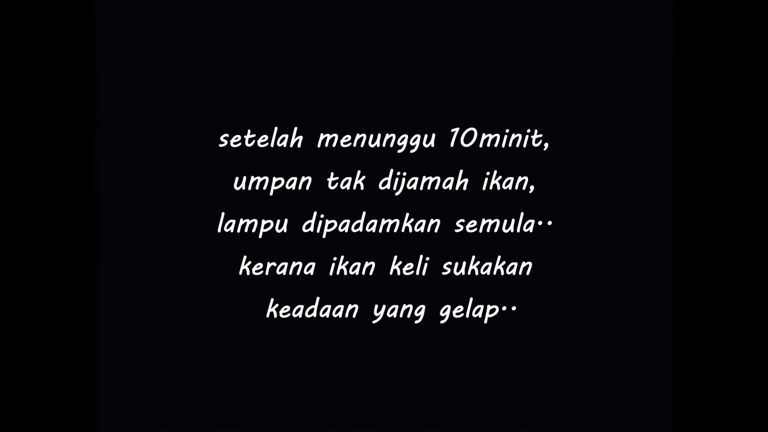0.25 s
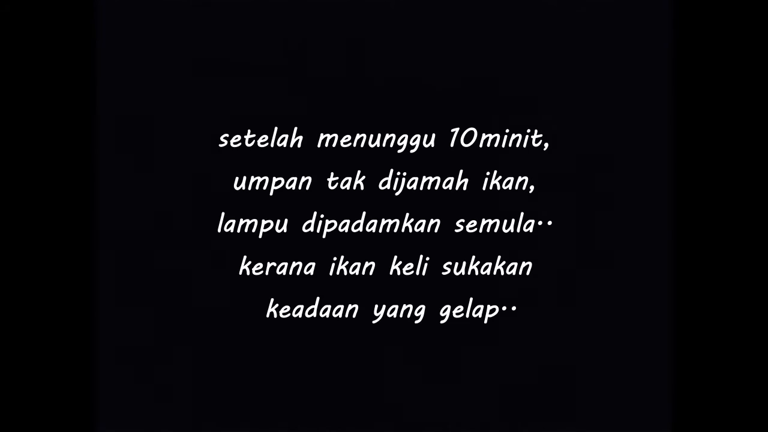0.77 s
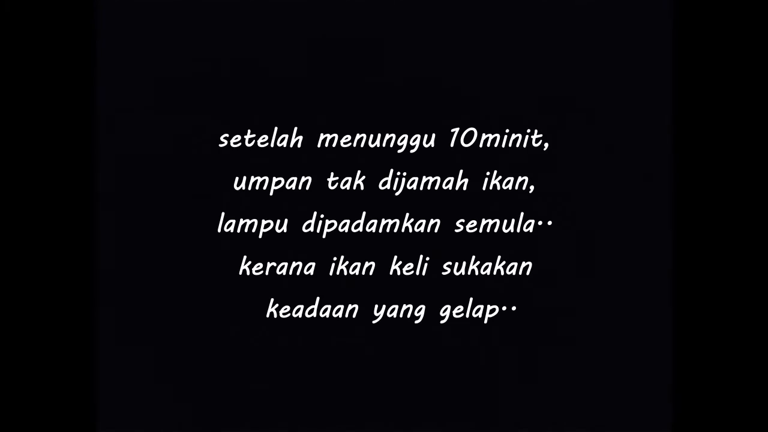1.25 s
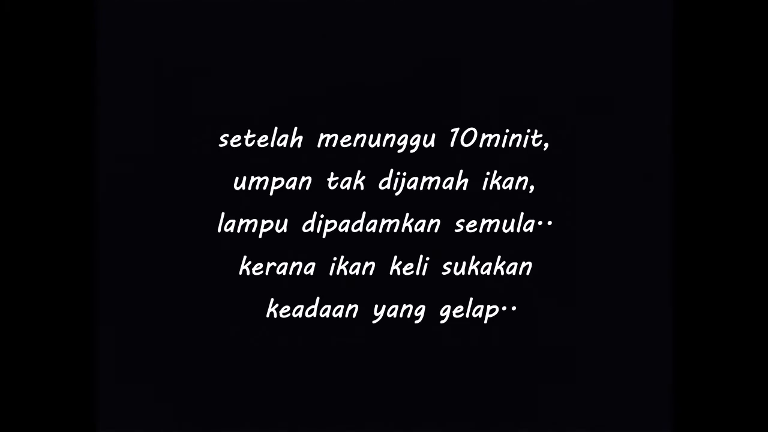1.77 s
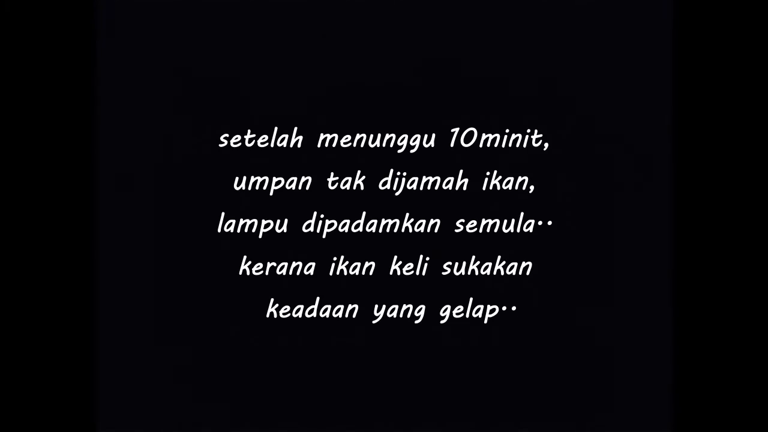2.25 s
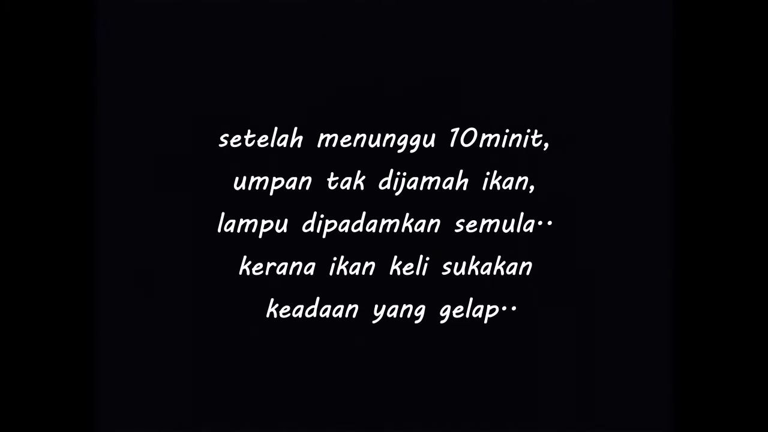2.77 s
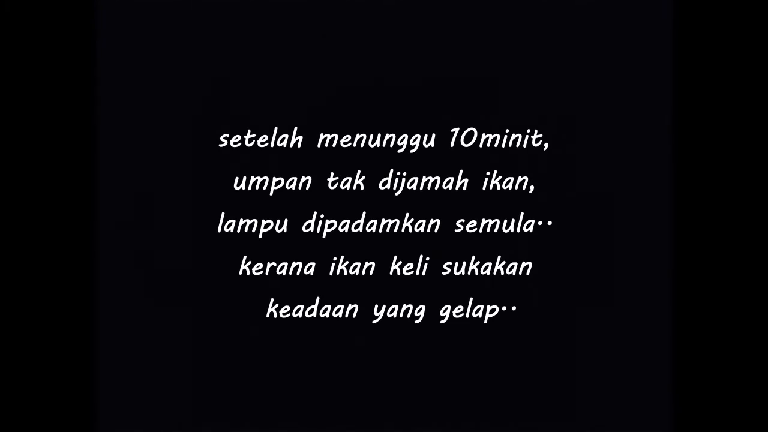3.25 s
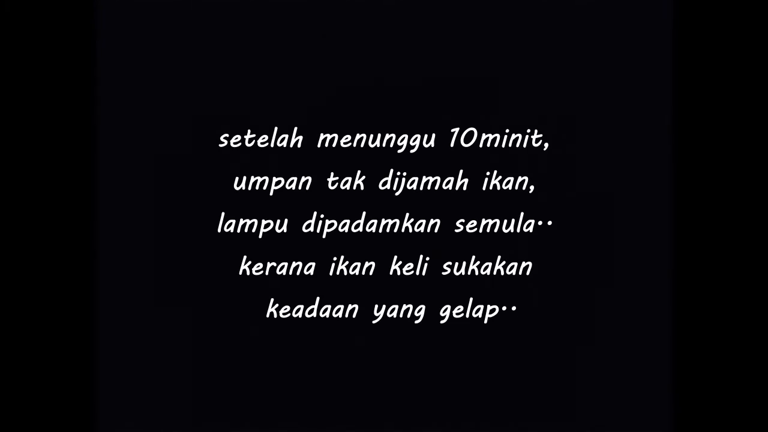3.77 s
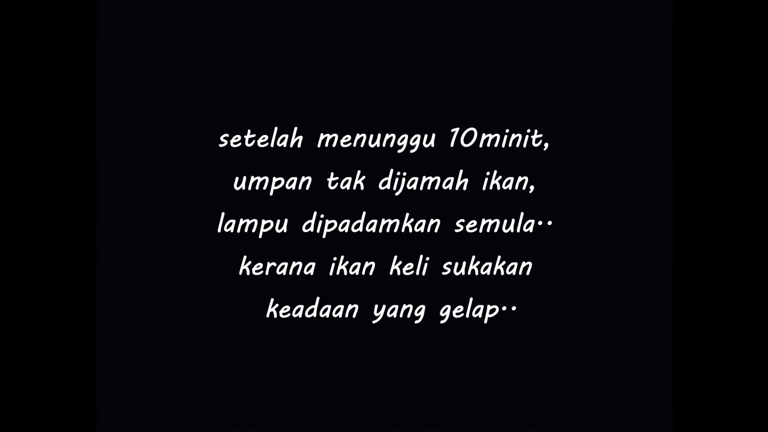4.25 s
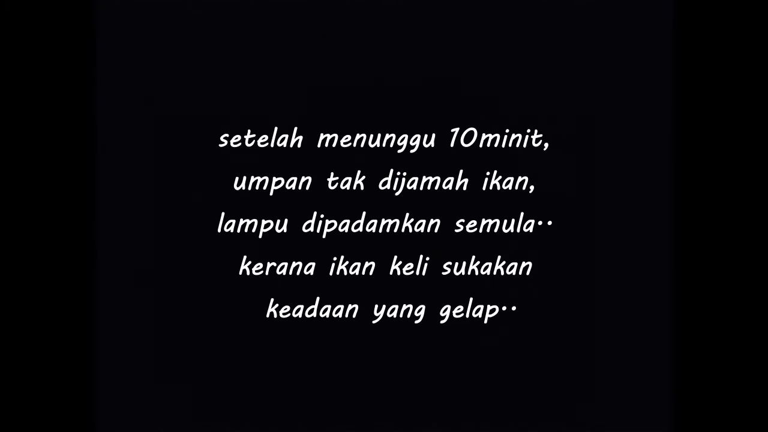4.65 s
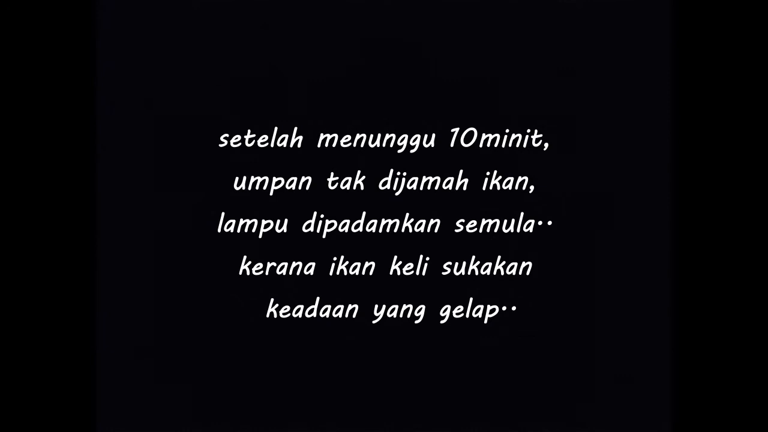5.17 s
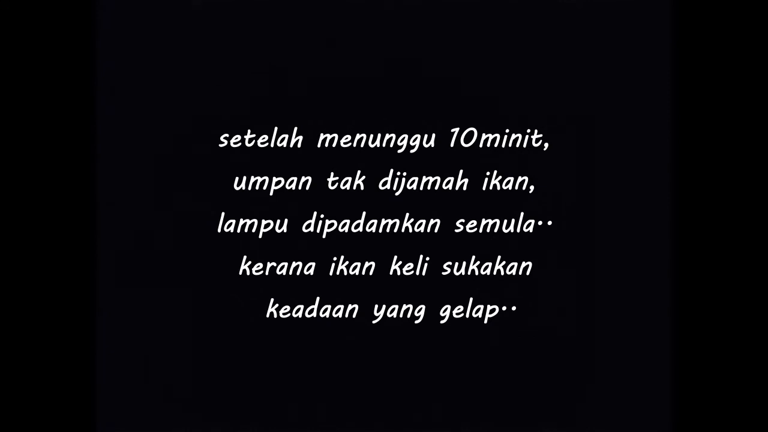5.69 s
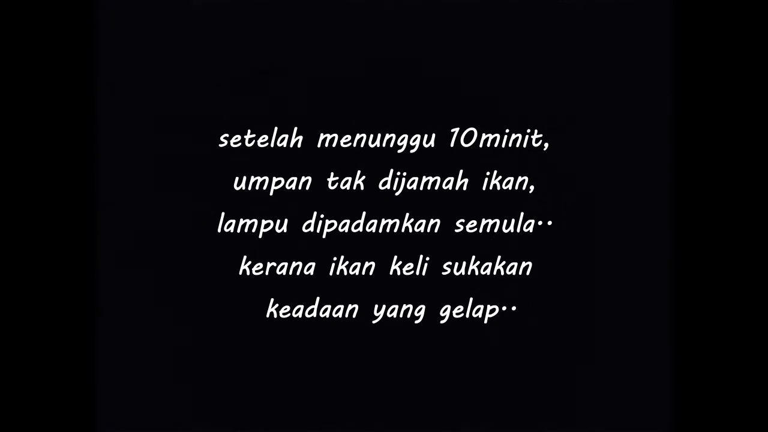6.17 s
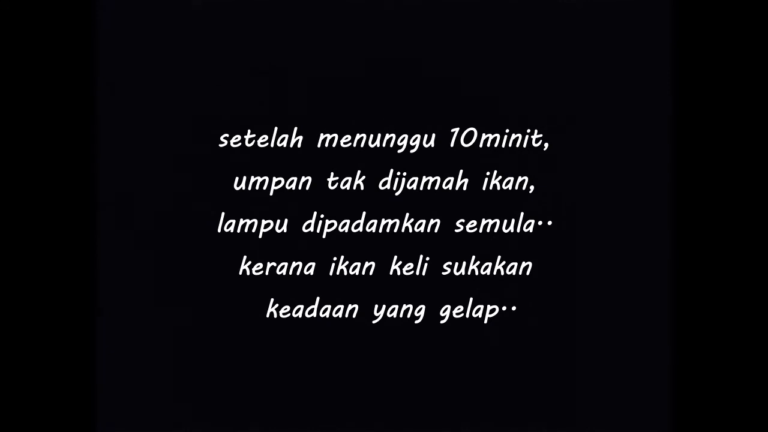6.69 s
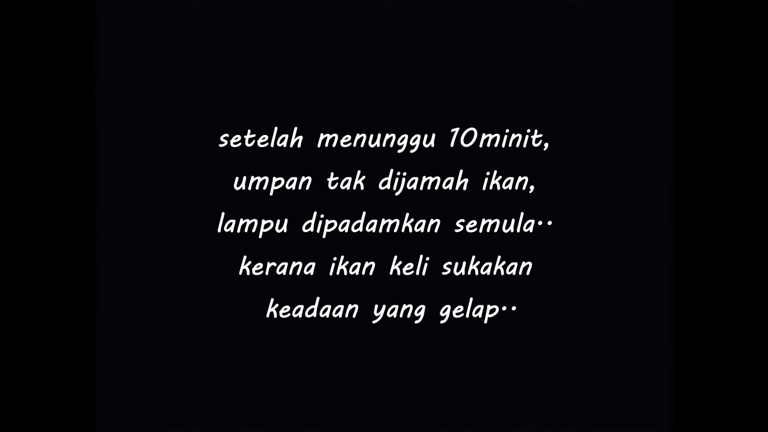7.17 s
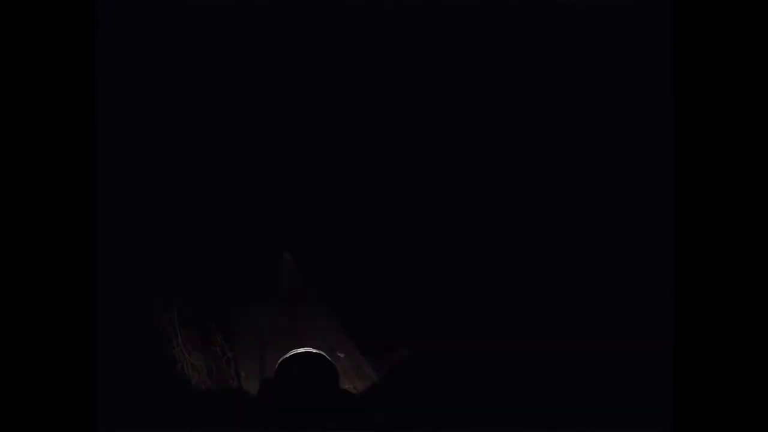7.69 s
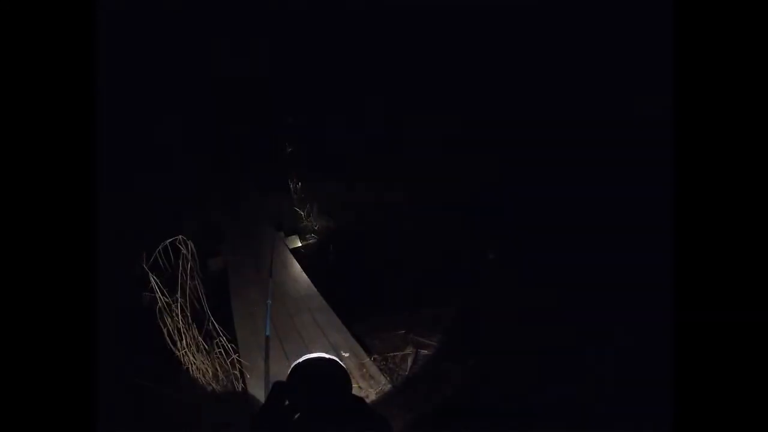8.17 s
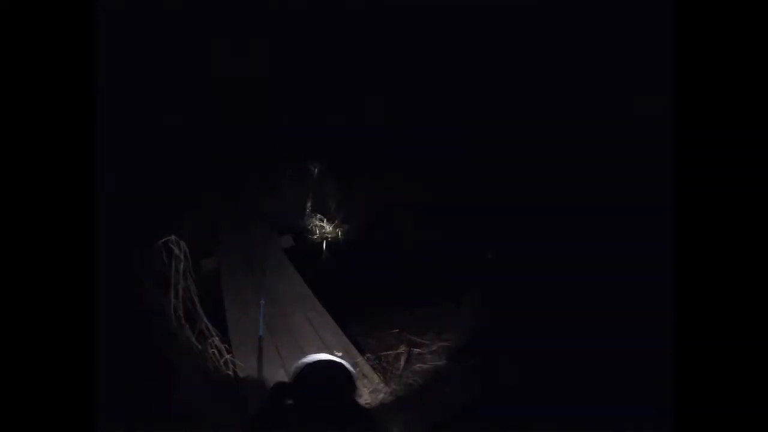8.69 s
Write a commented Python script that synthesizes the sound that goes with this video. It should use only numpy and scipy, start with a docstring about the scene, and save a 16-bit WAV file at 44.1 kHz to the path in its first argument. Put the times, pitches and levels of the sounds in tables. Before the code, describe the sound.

Outdoors at night, a close cricket trills rapidly over chirping field crickets, fast high katydid bursts and a blurred insect bed, with faint traffic rumble. After about seven seconds everything abruptly becomes much louder; fingers tap and rub a plastic lamp right at the microphone, its switch snaps twice, and the loud insects continue.

```python
"""Night beside a ditch: a dense chorus of crickets and katydids over a far traffic rumble.
From the start a close cricket trills in falling wing-stroke tones, others chirp in bouts, the rest blur into a bed.
A hoarse, distant caller returns every second or two; a far vehicle passes early and another late.
At 7.26 s the whole night jumps in volume; fingers then tap and rub a lamp right at the microphone.
Its switch snaps twice, at 7.58 and 7.77 s, as filtered impulses that ring the plastic shell."""
import sys
import numpy as np
from scipy import signal
from scipy.fft import rfft, irfft
from scipy.io import wavfile

SR = 44100
rng = np.random.default_rng(int(sys.argv[2]) if len(sys.argv) > 2 else 0)


def dump_mix(stems):
    """Bounce the given channels to the path in sys.argv[1] as a 16-bit WAV at rate SR."""
    frames = np.atleast_2d(stems).T  # one column per channel
    limited = np.clip(frames, -1, 1)  # hard clip at full scale
    pcm = np.round(limited * 32767).astype(np.int16)
    wavfile.write(sys.argv[1], SR, pcm)


N = 393813
TIME = np.arange(N) / SR   # seconds
CUTOFF_HZ = 15800


def from_db(db):
    """Decibels to gain."""
    return 10 ** (np.asarray(db) / 20)


def rms_one(x):
    """Scale to unit rms."""
    return x / np.sqrt(np.mean(x ** 2) + 1e-20)


def add(out, s, sound):
    """Mix a sound in, starting at s seconds."""
    start = int(round(s * SR))
    first, last = max(start, 0), min(start + len(sound), N)
    if last > first:
        out[first:last] += sound[first - start:last - start]


def beats(first_s, every_s, count, slowing_s=0):
    """Times of an even rhythm whose gap grows by slowing_s with every beat."""
    k = np.arange(round(count))
    return first_s + every_s * k + slowing_s * k * (k - 1) / 2


def bump(s, width_s):
    """A bell of height 1 round a moment."""
    return np.exp(-((TIME - s) / width_s) ** 2)


def drift(per_s):
    """Slow chance, rms 1: random points, per_s of them a second, joined by straight lines."""
    knots = rng.standard_normal(2000)
    return rms_one(np.interp(TIME * per_s, np.arange(len(knots)), knots))


def noise(spectrum):
    """Noise of rms 1, coloured by (Hz, relative dB) points joined on a log frequency scale."""
    hz, db = np.transpose(spectrum)
    bins = np.maximum(np.fft.rfftfreq(N, 1 / SR), 1)
    gain = from_db(np.interp(np.log(bins), np.log(np.sort(hz)), db, left=-80, right=-80))
    return rms_one(irfft(rfft(rng.standard_normal(N)) * gain, N))


def scatter(x, wet_db, t60):
    """Grass and banks send back a dense tail that falls 60 dB in t60 seconds."""
    t = TIME[:SR // 2]
    tail = rng.standard_normal(len(t)) * from_db(-60 * t / t60) * (t > .003)
    tail /= np.linalg.norm(tail)
    return x + from_db(wet_db) * signal.fftconvolve(x, tail)[:N]


def add_stroke(out, s, db, hz, fall_hz, length, overtone_db=-45):
    """One wing closing, centred on s: the scraper slows along the file, so the tone falls as it swells and fades."""
    t = np.arange(-length / 2, length / 2, 1 / SR)
    phase = 2 * np.pi * (hz * t - fall_hz * t ** 2 / (2 * length) + rng.random())
    overtone = from_db(overtone_db) * np.sin(2 * phase) * (2 * hz < CUTOFF_HZ)
    swell = np.cos(np.pi * t / length) ** 2
    add(out, s - length / 2, from_db(db) * swell * (np.sin(phase) + overtone))


def crowd(hz, fall_hz, length, per_s, spread=0.037):
    """Many wing strokes out of step, each a little off in pitch and loudness; rms 1."""
    chance = rng.random((6000, 4))[:int(per_s * N / SR)]
    when, size, detune, turn = chance.T[:, :, None]
    t = np.arange(-length / 2, length / 2, 1 / SR)
    carrier_hz = hz * (1 + spread * np.sqrt(12) * (detune - .5))
    phase = carrier_hz * t - fall_hz * t ** 2 / (2 * length) + turn
    tone = np.sin((2 * np.pi * phase).astype(np.float32))
    strokes = (1 + size) * np.cos(np.pi * t / length) ** 2 * tone
    at = (when * N).astype(int) + np.arange(len(t))
    return rms_one(np.bincount(at.ravel(), strokes.ravel(), N)[:N])


def engine(hz):
    """The firing note of a far engine, wavering in pitch and level."""
    wavering_hz = hz + 1.355 * drift(3)
    return from_db(1 + 2.4 * drift(5.3)) * np.sin(2 * np.pi * np.cumsum(wavering_hz) / SR)


# Colour of the night air and traffic. Each row: frequency in Hz, relative level in dB.
AIR_COLOUR = [(25, -8), (62, 2), (115, -10.5), (160, 0.5), (260, -22.5), (500, -28.5), (800, -21),
              (1050, -31.5), (1400, -29.5), (2000, -34.5), (10500, -23.5), (12300, -60), (14600, -28.5),
              (16000, -57)]
# Far vehicles pass. Each row: time when nearest in seconds, half-width in seconds,
# relative level in dB, mean engine note in Hz.
PASSES = [(1.2, .45, -54, 93), (8.05, 0.63, -48.5, 62.3)]


def traffic():
    """Faint air and the low hum and firing notes of far engines; the rumble swells as vehicles pass."""
    hum = from_db(-2) * noise([(45, -33), (56, -18.0), (63, 4.0), (70, -27.0), (85, -4.0), (110, -23.5),
                               (135, -13), (154, -16.5), (230, -31.0), (400, -43)])
    air = from_db(-56.0) * noise(AIR_COLOUR)
    idle = from_db(-65.5) * (hum + engine(62.5))
    whine = from_db(-67) * engine(158.3)   # a higher line of the far engine
    passing = sum(from_db(db) * bump(s, width_s) * (hum + engine(hz)) for s, width_s, db, hz in PASSES)
    return air + idle + whine + passing


# Distant crowds of insects. Each row: centre in Hz, fall over a stroke in Hz, stroke length in seconds,
# strokes per second, relative rms level in dB.
CROWDS = [(3079, 590, 0.03608, 110, -55), (4578, 1420, 0.0088, 250, -51), (6704, 410, 0.0087, 250, -55.5),
          (7570, 860, 0.01202, 560, -53.5)]
# How the 5 kHz crowd swells and sinks. Each row: time in seconds, level change in dB.
EAGERNESS = [(0, 1.5), (1.4, 3), (2.9, -2.5), (5.4, -2.5), (7.3, 6.5), (8.93, 5.5)]
# Colour of the blur of the farthest insects. Each row: frequency in Hz, relative level in dB.
BLUR_COLOUR = [(2400, -24), (2650, -16.5), (2900, -2.5), (3300, 9.5), (3650, -12.5), (4050, -8.5),
               (4550, 5.5), (5300, 6), (5750, -1), (6100, -11), (6650, 8), (7150, 0), (8300, 1), (9300, 1),
               (11200, -52)]


def chorus():
    """Crowds of strokes and a noise blur behind them; fixed paths through the grass ripple their colour."""
    crowds = sum(from_db(db) * crowd(hz, fall_hz, length, per_s)
                 for hz, fall_hz, length, per_s, db in CROWDS)
    field_db = -52.5 + np.interp(TIME, *np.transpose(EAGERNESS))
    field = from_db(field_db) * crowd(5066, 930, 0.022, 200, spread=0.034)
    blur = from_db(-44.0 + .5 * drift(24)) * noise(BLUR_COLOUR)
    return scatter(crowds + field + blur, wet_db=-7.5, t60=0.32)


# Far steady trillers. Each row: carrier in Hz, strokes per second, fall over a stroke in Hz,
# relative level in dB.
DRONES = [(4619, 73, 800, -49.5), (5556, 129, 950, -48.5), (5061, 36, 600, -49), (6848, 72, 500, -55),
          (8339, 110, 300, -59)]


def drones(waver_hz=5, flutter_db=-3.5):
    """Far trillers so regular that each draws a comb of fine lines round its carrier."""
    out = np.zeros(N)
    for hz, per_s, fall_hz, db in DRONES:
        # place within each stroke, -0.5 to 0.5
        cycle = (per_s * TIME + 0.036 * drift(4.3)) % 1 - .5
        waver = np.cumsum(waver_hz * drift(9)) / SR
        phase = hz * TIME + waver - fall_hz * cycle ** 2 / (2 * per_s)
        strokes = np.cos(np.pi * cycle) ** 2 * np.sin(2 * np.pi * phase)
        out += from_db(db + flutter_db * drift(16)) * rms_one(strokes)
    return scatter(out, wet_db=-5.5, t60=0.033) * from_db(-8.0)


# A far animal calls hoarsely. Each entry: middle of the call in seconds.
FAR_CALLS = [1.17, 2.39, 3.67, 5.08, 6.55, 8.9]


def far_caller(call_s=0.41, level_db=-69):
    """Soft, hoarse calls just below the crickets: swells of band-coloured noise."""
    calls = np.zeros(N)
    for s in FAR_CALLS:
        add(calls, s - call_s / 2, signal.windows.hann(int(call_s * SR)))
    return from_db(level_db) * calls * noise([(1700, -17), (2100, 0), (2350, 3), (2800, -6)])


# A low-pitched cricket further off. Each row: first stroke in seconds, number of strokes.
LOW_PHRASES = [(0.111, 4), (.66, 3), (1.361, 2), (1.949, 4), (2.568, 2), (3.141, 4), (3.67, 4), (4.398, 2),
               (4.82, 4), (5.231, 2), (5.6, 3), (5.92, 2), (6.829, 4), (7.86, 4), (8.48, 3)]


def low_cricket(gap_s=.066, level_db=-53.5):
    """Slow, soft strokes just under the trill in pitch, blurred by distance."""
    out = np.zeros(N)
    for s, strokes in LOW_PHRASES:
        for when in beats(s, gap_s, strokes):
            db, hz = level_db + rng.normal(0, 1.2), 2780 + rng.normal(0, 25)
            add_stroke(out, when, db, hz, fall_hz=520, length=.045)
    return scatter(out, wet_db=-3, t60=0.7)


def raspers(rasp_s=0.29, buzz_s=0.74, rasp_db=-50, uneven_db=1.7):
    """Dense strokes gated three times a second round a ringing core; a higher insect joins with slower buzzes."""
    rasp, buzz = np.zeros(N), np.zeros(N)
    # the rasping speeds up a little with every rasp
    for s in beats(.058, .3353, count=28, slowing_s=-.0009):
        swell = signal.windows.tukey(int(rasp_s * SR), .7)
        add(rasp, s - rasp_s / 2, from_db(rasp_db + rng.normal(0, uneven_db)) * swell)
    for s in beats(3.26, 0.65, count=9):
        add(buzz, s - buzz_s / 2, signal.windows.tukey(int(buzz_s * SR), .5))
    rasping = crowd(8120, 900, .006, 500, spread=.035)
    core = from_db(-8) * noise([(8200, -31), (8330, -7), (8460, -8)])
    buzzing = from_db(-63.5) * crowd(9840, 900, 0.0058, 400, spread=0.029)
    return rasp * (rasping + core) + buzz * buzzing


# The katydid's runs. Each row: middle of the first burst in seconds, number of bursts.
KATYDID_RUNS = [(.05, 10), (1.42, 59)]


def katydid(gap_s=.0083, count=11, level_db=-43.5, taper_db=5, image_db=-79.5):
    """Bursts of very fast, high strokes, with a faint high hiss from the recorder pulsing with each burst."""
    out, bursts = np.zeros(N), np.zeros(N)
    for first_s, size in KATYDID_RUNS:
        for middle in beats(first_s, .1282, size, slowing_s=.000133):
            add(bursts, middle - gap_s * count / 2, signal.windows.tukey(int(gap_s * count * SR)))
            # the strokes swell towards the middle of the burst and fade again
            for place in np.linspace(-1, 1, count):
                when = middle + place * gap_s * (count - 1) / 2 + rng.normal(0, 0.00025)
                db = level_db - taper_db * place ** 2 + rng.normal(0, 1.2)
                add_stroke(out, when, db, hz=9380 + rng.normal(0, 60), fall_hz=1400, length=.007)
    # the recorder's hiss, near 14.6 kHz
    image = from_db(image_db) * bursts * noise([(13200, -10), (14600, 0), (15600, -15)])
    return scatter(out + image, wet_db=-8, t60=.06)


# Bouts of the chirping field crickets. Each row: first stroke in seconds, number of chirps,
# strokes per chirp, relative level in dB, middle carrier in Hz.
BOUTS = [(.019, 6, 3, -38, 5130), (1.376, 1, 2, -43, 5330), (2.405, 3, 3, -46, 5100),
         (5.617, 1, 2, -32.5, 5380), (5.795, 3, 3, -25.5, 5460), (6.528, 3, 3, -42.5, 5150),
         (7.338, 1, 2, -26, 5430), (7.399, 4, 3, -38, 5180), (8.352, 3, 3, -38, 5220)]


def chirps():
    """Every bout as its evenly spaced chirps; the near cricket is a little quicker."""
    for first_s, count, strokes, db, hz in BOUTS:
        every_s = .2215 if db > -30 else .2258
        for s in beats(first_s, every_s, count):
            yield s, round(strokes), db, hz


def field_crickets(gap_s=.0425, opening_db=-10, diffuse_db=-38, near_db=-22):
    """Chirps of a few steep strokes, the opening one soft and rich in overtone; far ones are duller and diffuse."""
    direct, diffuse = np.zeros(N), np.zeros(N)
    for s, strokes, db, hz in chirps():
        nearness_db = db - near_db
        add_stroke(direct, s, db + opening_db, hz, fall_hz=1750, length=0.023,
                   overtone_db=-5.5 + nearness_db)
        for k in range(1, strokes):
            stroke_db = db + 2 - .1 * nearness_db + rng.normal(0, .8)
            add_stroke(direct, s + k * gap_s, stroke_db, hz + rng.normal(0, 30), fall_hz=1750,
                       length=.028, overtone_db=-33)
        # the scattered sound hardly depends on how near the cricket is
        scattered_db = diffuse_db + 0.057 * (db - diffuse_db)
        for k in range(strokes):
            add_stroke(diffuse, s + k * gap_s, scattered_db, 5317, fall_hz=1160, length=.028)
    # the grass swallows the top of the overtones
    direct = signal.sosfilt(signal.butter(8, 10500, fs=SR, output="sos"), direct)
    tail_only = scatter(diffuse, wet_db=-2.5, t60=0.22) - diffuse
    return scatter(direct, wet_db=-16, t60=0.2) + tail_only


# The close cricket's trills. Each row: first stroke in seconds, number of strokes,
# strokes per second when it does not falter.
TRILLS = [(.024, 71, 29.0), (3.373, 119, 29.3), (8.198, 22, 29.6)]
# Its effort. Each row: time in seconds, relative stroke level in dB.
TRILL_EFFORT = [(0, -41), (1.3, -40.5), (1.6, -33), (3.6, -33.5), (6.5, -38.5), (7.6, -37), (8.4, -35)]
# It falters now and then. Each row: middle in seconds, share of its speed lost.
FALTERS = [(1.29, .205), (2.49, .31), (4.31, .275), (5.13, .105), (5.84, .28), (6.58, .11), (7.23, .15),
           (7.57, .25)]
# Slow single strokes between trills. Each row: first stroke in seconds, number of strokes.
IDLING = [(2.665, 2), (2.912, 3), (7.69, 5)]


def triller(falter_s=.11, idle_gap_s=.071, idle_db=-45.5, warm_up_db=6.5, warm_up_s=.043):
    """A close cricket trills at an even speed from a soft start, falters briefly, and idles between trills."""
    speed = 1 - sum(lost * bump(s, falter_s) for s, lost in FALTERS)
    # strokes are even in progress, so they spread out in time where the speed sags
    progress = np.cumsum(speed) / SR
    strokes = [(when, idle_db) for s, count in IDLING for when in beats(s, idle_gap_s, count)]
    for s, count, per_s in TRILLS:
        start = np.interp(s, TIME, progress)
        when = np.interp(beats(start, 1 / per_s, count), progress, TIME)
        effort_db = np.interp(when, *np.transpose(TRILL_EFFORT))
        strokes += zip(when, effort_db - warm_up_db * np.exp((s - when) / warm_up_s))
    out = np.zeros(N)
    for when, db in strokes:
        add_stroke(out, when, db + rng.normal(0, .5), hz=3300 + rng.normal(0, 12), fall_hz=540, length=.029)
    # one early echo from the ground, 6.5 ms later
    echo = from_db(-13) * np.interp(TIME - .0065, TIME, out)
    return scatter(out + echo, wet_db=-13, t60=.15)


def soften(force, hard_hz):
    """A soft contact has less treble: a gentle low-pass at hard_hz."""
    # the tiny offset keeps the filter clear of vanishing numbers
    return signal.sosfilt(signal.butter(1, min(hard_hz, SR / 2.2), fs=SR, output="sos"), force + 1e-18)


def snap(s, db, hard_hz, knock):
    """The force of one snap of the switch: a sharp contact and the dull, resonant knock of the button."""
    contact = soften(from_db(db) * signal.unit_impulse(N, int(s * SR)), hard_hz)
    return contact + knock * signal.lfilter(*signal.iirpeak(2340, 4.7, fs=SR), contact)


# Fingers on the lamp. Each row: start in seconds, relative strength in dB.
TAPS = [(7.292, -14), (7.322, -18), (7.336, -17), (7.369, -8.5), (7.393, -10), (7.485, -9), (7.547, -8),
        (7.561, -6), (7.716, -20), (7.73, -16.5), (7.798, -11.5)]
# The switch snaps and rebounds. Each row: time in seconds, strength in dB, hardness in Hz,
# share of dull knock.
SWITCH = [(7.582, 7.5, 6540, 0.11), (7.5847, -7.5, 6000, 0.27), (7.7747, 1.5, 2210, 1.26),
          (7.7768, -14, 4000, 0.28)]
# Ringing modes of the lamp's plastic shell. Each row: frequency in Hz, gain in dB,
# time to fall 60 dB in seconds.
SHELL = [(744, -37, 0.07), (1610, -31, 0.0083), (2000, 3.5, 0.0029), (4080, 7.5, 0.0035), (4690, 6, 0.004),
         (7430, 9.5, 0.0024), (10300, -32, .003)]


def lamp(slips_per_s=220):
    """Finger taps, small random slips and the snaps of the switch ring the modes of one shell."""
    slide = np.interp(TIME, [7.25, 7.34, 7.44, 7.57, 7.85], [0.001, 0.66, 0.2, 0.16, 0.075])
    slips = (rng.random(N) < slips_per_s / SR) * rng.standard_normal(N)
    touch = from_db(-22.0) * slide * slips
    for s, db in TAPS:
        grit = rng.standard_normal(SR // 20) * np.exp(-TIME[:SR // 20] / .0018)
        add(touch, s, from_db(db + 1.5) * grit / np.linalg.norm(grit))
    force = soften(touch, hard_hz=850)
    force += sum(snap(*row) for row in SWITCH)
    ringing = np.zeros(N)
    for k, (hz, db, t60) in enumerate(SHELL):
        r, w = from_db(-60 / (t60 * SR)), 2 * np.pi * hz / SR
        mode = signal.lfilter([0, np.sin(w)], [1, -2 * r * np.cos(w), r * r], force)
        ringing += (-1) ** k * from_db(db) * mode   # neighbouring modes in opposite phase
    # the hand brushes the shell, most before the press
    brushing = noise([(200, -16), (500, -2.5), (750, 5), (1100, 3), (1500, -1.5), (2600, -9), (5000, -25)])
    rub = from_db(-37.5 + 2 * drift(140)) * slide * brushing
    return scatter(ringing, wet_db=-27.0, t60=0.37) + rub


STEP_S, STEP_DB = 7.2565, 17.5


def scene():
    """All the insects, the caller and the traffic jump in volume together; the lamp is right at the microphone."""
    night = traffic() + chorus() + drones() + far_caller() + low_cricket()
    night += raspers() + katydid() + field_crickets() + triller()
    # the night sits at -1.5 dB and dips briefly after the second click
    night_db = np.interp(TIME, [7.775, 7.781, 7.797, 7.799], [-1.5, -8.5, -10.0, -1.5])
    night_db += STEP_DB * (TIME >= STEP_S)
    return (night * from_db(night_db) + lamp())[None]


def record(dry):
    """The loudest peaks overload softly and a steep low-pass cuts the top."""
    clipped = dry / (1 + (dry / 1.05) ** 6) ** (1 / 6)
    return signal.sosfilt(signal.ellip(10, .1, 80, CUTOFF_HZ, fs=SR, output="sos"), clipped)


dry = scene()
out = record(dry)
dump_mix(out)
```